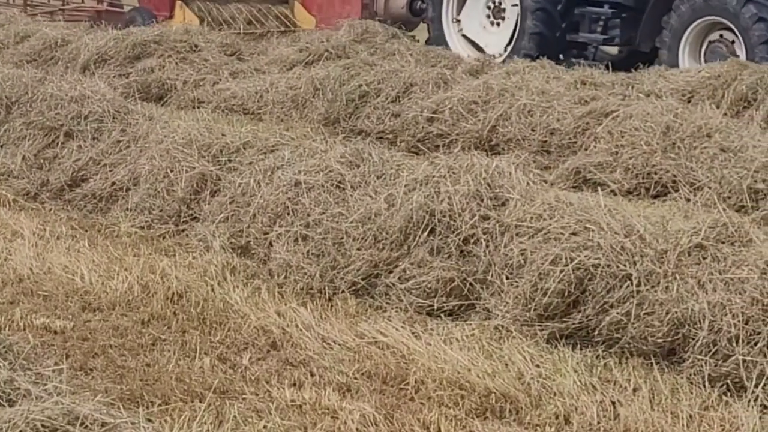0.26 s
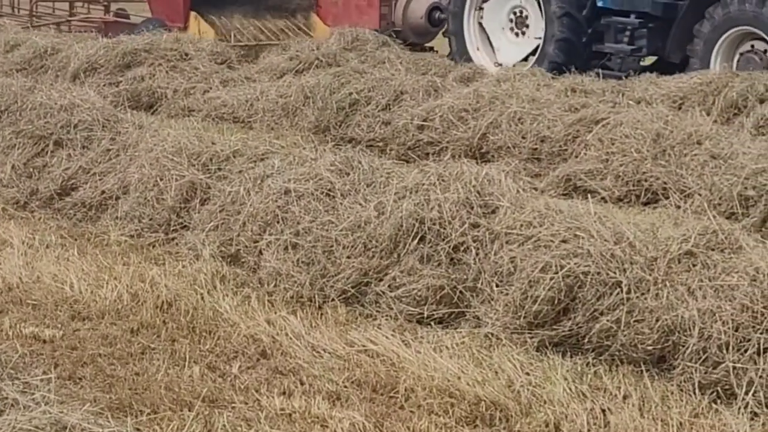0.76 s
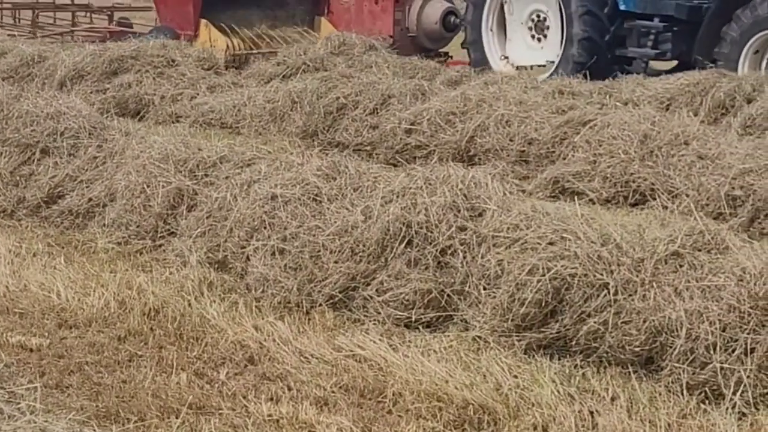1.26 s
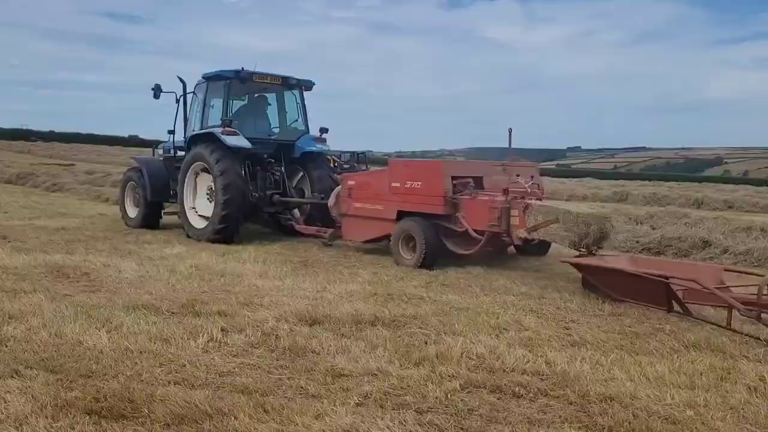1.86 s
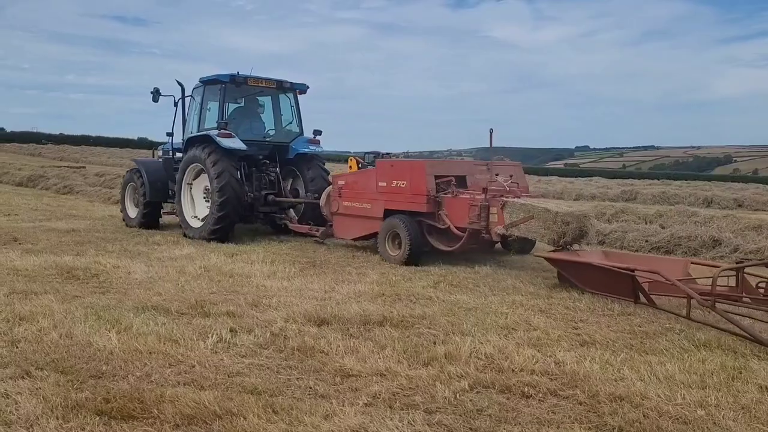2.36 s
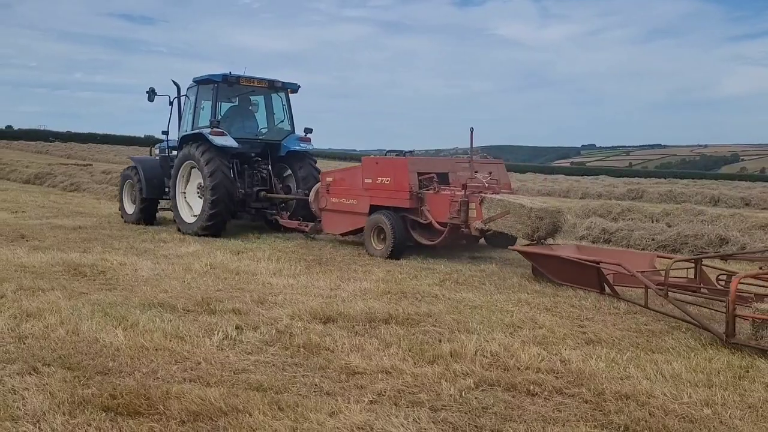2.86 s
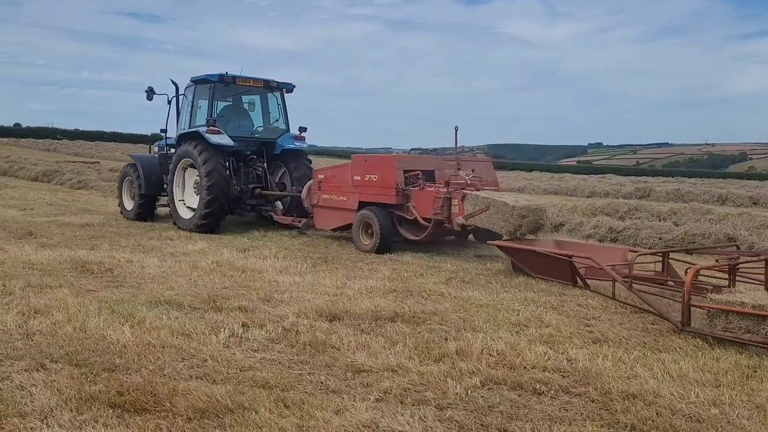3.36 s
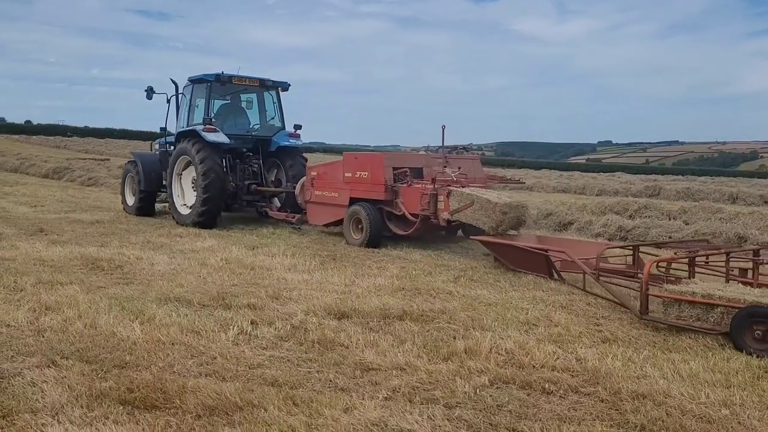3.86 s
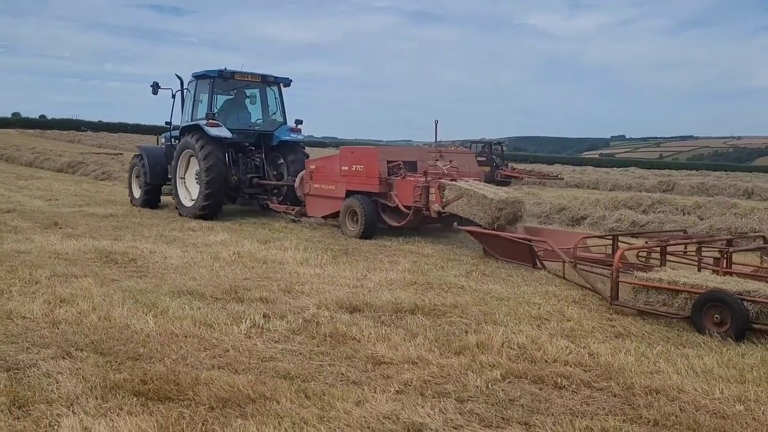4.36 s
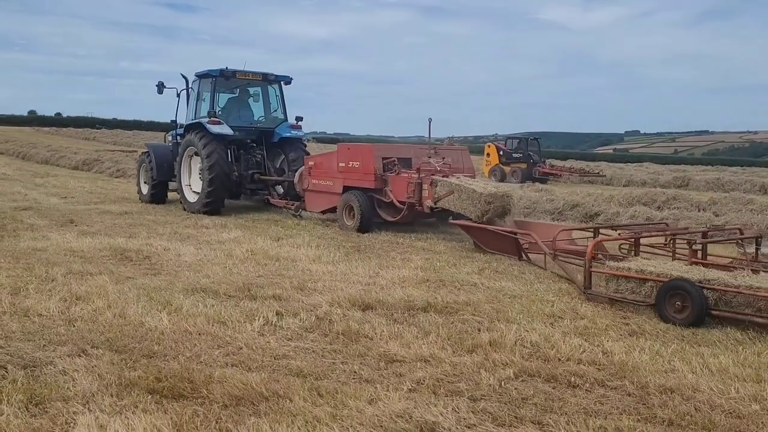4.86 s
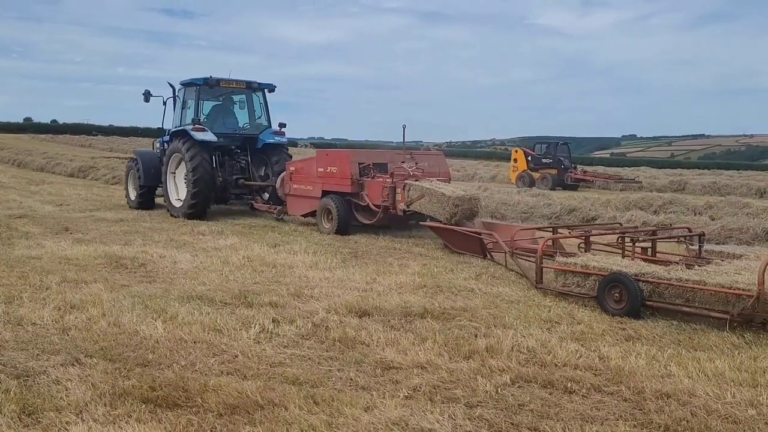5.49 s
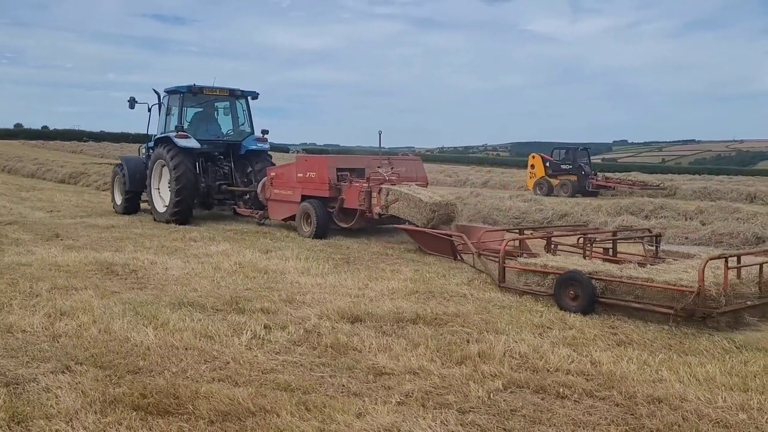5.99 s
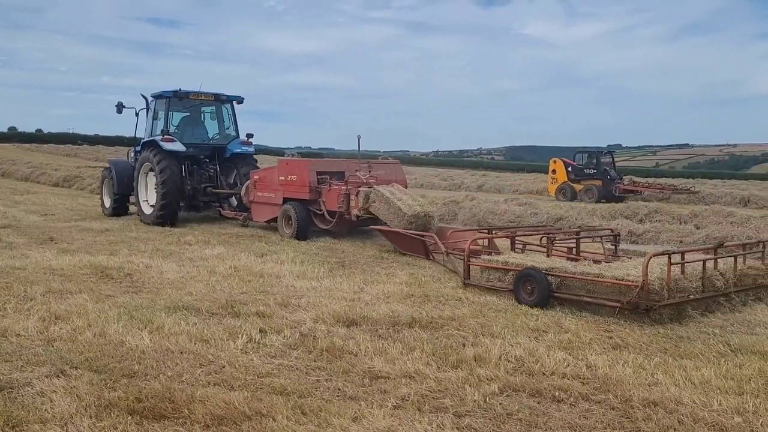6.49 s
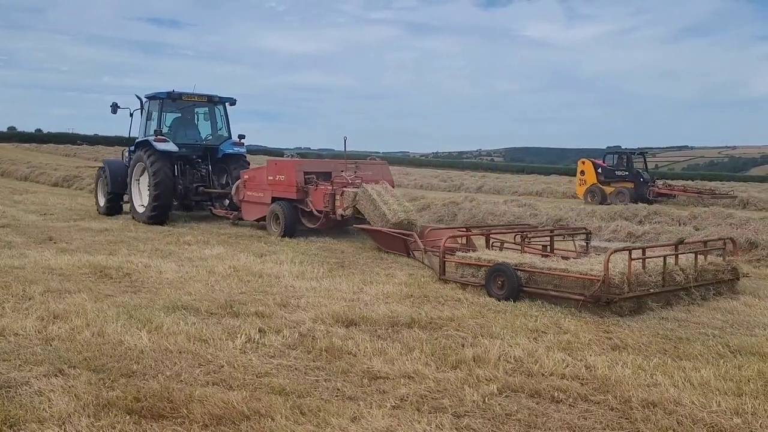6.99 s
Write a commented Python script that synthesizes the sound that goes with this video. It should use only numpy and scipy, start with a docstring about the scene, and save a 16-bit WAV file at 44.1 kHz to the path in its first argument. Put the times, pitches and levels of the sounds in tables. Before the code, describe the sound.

A diesel tractor drones while chains and dry hay rustle close by, then, after a brief gap, a baler clanks about once a second with squeaks.

```python
"""Hay field, two listening places a short near-silence apart: a diesel tractor tows a square baler and a bale sledge.
Place one, beside the windrow: exhaust and drive drone in sines, chains and pickup tines rattle in shaped noise.
Place two, behind as the baler draws away: about once a second plunger joints clank in noise bursts and steel modes;
the chamber rumbles after each stroke, chains rattle, hay slides over steel and a dry bearing squeaks.
Loose steel clinks and the chamber booms at both places. The microphone has two ports, left and right."""
import sys
import numpy as np
from scipy import signal
from scipy.fft import rfft, irfft, next_fast_len
from scipy.io import wavfile
from scipy.ndimage import map_coordinates

SR = 44100
rng = np.random.default_rng(int(sys.argv[2]) if len(sys.argv) > 2 else 0)


def master(y):
    """Save y as 16-bit WAV."""
    cut = np.clip(np.atleast_2d(y).T, -1, 1)
    pcm = np.round(cut * 32767)  # scale
    wavfile.write(sys.argv[1], SR, pcm.astype(np.int16))


N = 319284
TIME = np.arange(N) / SR
BESIDE_END, BEHIND_START = 1.898, 2.015  # t/s at the two places
TOP_HZ = 15950  # upper band limit

# four-stroke cycles a second; four firings in each
CYCLE_HZ = 12.62
# exhaust lines: multiple of the cycle rate, level beside/dB, level behind/dB
EXHAUST = [(4, -41, -30.5), (5, -47.5, -41), (6, -38.5, -37), (9, -37, -41), (10, -45, -36.5),
           (23, -51.5, -44.5)]
# drone of the baler drive: t/s, f/Hz, level/dB of the fundamental
DRONE = [(0, 78.5, -33), (.45, 77.9, -29.5), (.95, 78.3, -34), (1.4, 76.14, -28), (1.85, 78.5, -27.5),
         (2.2, 78.45, -35), (7.2, 77.16, -42)]

# plunger strokes: t/s, size of the wad of hay (1 = usual)
STROKES = [(.381, 0.88), (1.318, 0.95), (2.245, 1.13), (3.189, 1.06), (4.127, 1.07), (5.063, 1.04),
           (5.994, 0.9), (6.937, 0.67)]
# clanks of one stroke: first joint t/s, level/dB, second joint lag/s, level/dB,
# third joint lag/s, level/dB, pitch of the clack f/Hz
CLANKS = [(2.2445, -11.5, .0274, -17.5, .052, -14, 2580), (3.1898, -18, .0339, -16, .0478, -13, 2780),
          (4.127, -10.5, .0169, -16, .0635, -11.5, 2490), (5.0638, -10.5, .0234, -15.5, .0414, -14, 2590),
          (5.9943, -10, .0336, -17, .0588, -14, 2610), (6.937, -13, .0495, -13, 0.057, -23.5, 2830)]
# three slack joints, in slamming order, relative to each blow: body level/dB, edge level/dB, clack level/dB
JOINTS = [(-10.5, -18, -5), (-12, -18.5, -14.5), (-10.5, -16, -12)]
# modes of the clack: ratio to its pitch, relative level/dB
CLACK_MODES = [(.93, -4), (1, -0.5), (1.06, -1), (1.27, -10)]
# steel modes of the plunger linkage: f/Hz, relative level/dB
STEEL_MODES = [(748, -3), (931, -4.5), (1475, 3.5), (2060, 6), (2326, -19), (2536, -2), (2756, -2.5),
               (2977, 2), (3488, -0.5), (4043, 1.5), (4387, -11), (5044, -9), (5450, -3), (7321, -8.5)]
# clank noise spectra, casing body, steel and hard edge: f/Hz, relative level/dB
CLANK_BODY = [(450, -7.5), (750, 1), (1400, -7.5), (2200, -9)]
CLANK_STEEL = [(1400, 1), (2750, -1), (3700, 1.5), (5500, -1), (6500, -32)]
CLANK_EDGE = [(6000, -1.5), (7800, -5), (9200, -11), (12000, -6.5), (16000, -17)]
CHATTER_DB, CHATTER_PER_S = 4.5, 220  # casing chatter: depth, knots a second

# frame and bale chamber rumble spectra: f/Hz, relative level/dB
FRAME = [(45, -12.5), (85, 0.5), (115, -2.5), (150, -2.5), (185, -7), (230, -11.5), (400, -50.5)]
CHAMBER = [(120, -32), (180, -6), (225, -1), (255, 3), (300, -4.5), (345, -5.5), (450, -27), (700, -24.5)]
# bale chamber booms: t/s, frame f/Hz, frame peak level/dB, wall f/Hz, wall peak level/dB
BOOMS = [(.24, 112, -25, 255, -36.5), (.76, 110, -20, 228, -25.5), (1.65, 160, -28.5, 215, -27.5),
         (2.48, 145, -21, 255, -36), (2.68, 148, -21.5, 255, -28.5), (3.55, 150, -26.5, 266, -24.5),
         (4.37, 124, -22, 245, -40), (4.51, 132, -22, 255, -32), (5.42, 155, -30, 255, -26.5),
         (6.37, 125, -30, 250, -26)]

# hay combed up by the pickup tines, before breakage is added: t/s, level/dB
PICKUP_FLOW = [(0, -48), (.2, -47), (.31, -42.5), (.5, -46.5), (.57, -40), (.65, -42.5), (.72, -40.5),
               (.88, -45), (1.12, -48), (1.25, -43.5), (1.45, -42.5), (1.56, -38.5), (1.72, -42),
               (1.9, -46)]
# hay sliding over steel, before the stroke swells: t/s, level/dB
HAY_FLOW = [(2, -52.5), (2.6, -53), (3.1, -53), (4.8, -55.5), (5.8, -53), (6.5, -51.5), (7.2, -50)]
# hay and chain spectra at each place, and the bale sledge: f/Hz, relative level/dB
HAY_BESIDE = [(1590, -41), (2700, 1), (3020, -14.5), (3450, 2.5), (3830, -2), (4220, -1.5), (9790, -14.5),
              (11900, -11.5), (16000, -21.5)]
HAY_BEHIND = [(3530, -7), (6000, -7.5), (6900, -12), (7960, -10.5), (8750, -16.5), (12700, -11.5),
              (16000, -22)]
CHAIN_BESIDE = [(250, -33), (430, -13), (480, -19), (530, -5), (577, -10), (688, -6.5), (878, -9),
                (1080, -4), (1300, -14.5), (1480, -6.5), (1810, -10), (2090, -14.5), (3020, -23),
                (3200, -20.5), (4160, -36), (7040, -120)]
CHAIN_BEHIND = [(250, -1.5), (420, -2), (454, -7), (632, 0), (1010, -13), (1600, -15), (2080, -43),
                (3520, -120)]
SLEDGE = [(820, -3), (1400, 2.5), (1720, -1.5), (1960, 3.5), (2120, -0.5), (2750, -2.5), (3310, -8),
          (5290, -13), (6800, -36.5), (8840, -56), (15000, -120)]
# gears and sprockets of the pickup, before GEAR_DB: f/Hz, level/dB
GEAR_LINES = [(549.1, -53), (995.9, -48), (1120, -51), (1534, -53), (1755, -48)]
GEAR_DB = -1

# dry bearing squeaks: t/s, length/s, start f/Hz, end f/Hz, relative level/dB, growth/dB, overtone level/dB
SQUEAKS = [(2.785, .12, 1790, 1760, -40, 2, -1), (2.89, .105, 1650, 1626, -37.5, 7, -14),
           (3.072, .135, 1586, 1612, -32, -11, -24), (3.45, .105, 1606, 1638, -27.5, 10, -27),
           (4.37, .095, 1825, 1830, -42.5, 0, -17), (4.535, .065, 1835, 1805, -42, 2, -15),
           (4.63, .12, 1628, 1620, -42, 2, -18), (5.875, .125, 1794, 1764, -34.5, -2, -11),
           (5.98, .135, 1778, 1776, -33.5, -10, -24), (6.655, .062, 1560, 1572, -35, 0, -9),
           (6.706, .056, 1574, 1588, -36, 1, -10), (6.752, .06, 1600, 1606, -45, -4, -20),
           (6.87, .075, 1995, 1975, -44, 3, -28)]
# overtones of a squeak: multiple of its pitch, relative level/dB
OVERTONES = [(2, -8), (3, -12), (4, -11), (5, -14), (6, -23), (7, -19), (8, -25)]
# loose steel clinking: t/s, relative tap level/dB, ring f/Hz, relative ring level/dB
CLINKS = [(.381, -35, 4300, -36.5), (.445, -33, 5500, -43), (0.8306, -47, 6020, -37),
          (1.216, -42, 6170, -42), (1.319, -27.5, 3480, -47), (1.54, -37, 6240, -36.5),
          (2.5486, -35.5, 12500, -41), (2.7194, -35, 12700, -41.5), (3.053, -37, 4000, -38),
          (3.1174, -37, 5500, -33), (4.036, -33, 5690, -36.5), (4.562, -46, 5400, -38.5),
          (5.137, -33, 4000, -33), (5.2165, -34, 3950, -34), (6.1644, -40, 11000, -50),
          (6.2159, -24.5, 4550, -35), (6.23, -38.5, 7960, -37), (6.311, -39, 6030, -40),
          (6.332, -33, 9200, -47), (6.42, -35, 4200, -48), (6.485, -33, 5700, -41),
          (6.3757, -32.5, 4900, -38), (6.464, -36, 3010, -41), (6.5158, -30, 4600, -36),
          (6.5464, -32.5, 4600, -38), (6.566, -34, 7920, -35), (6.604, -34, 4280, -41)]
# modes of a loose pin: ratio to the ring pitch, relative level/dB
PIN_MODES = [(.92, -5), (0.998, 4), (1.025, -7), (1.11, -7)]
# spectrum of a bright tap: f/Hz, relative level/dB
CLINK_BAND = [(3000, 5), (4500, 3.5), (9000, -14), (15000, -21)]

# two microphone ports at each place: f/Hz, likeness of the ports (0 to 1),
# nominal left lead/rad, nominal left minus right level/dB
PORTS_BESIDE = [(270.6, 0.94, 0.1, -5), (412, 0.62, 1.1, -6), (530, 0.89, 0.97, 5.5), (780, 1, 0.24, -2),
                (1080, 0.85, 1.3, -3), (1580, 0.68, 4.85, -5.5), (1870, 0.94, 7.65, 0.5),
                (2880, .3, 7.7, 3), (4000, 0.48, 6.2, 1.5), (11000, .15, 8.8, -2.5)]
PORTS_BEHIND = [(200, 1, 0.39, -4), (754, 0.91, 0.24, -2.5), (1110, 0.43, -1, 0), (1600, 0.61, -1.2, 2),
                (2430, 0.14, 1.5, 6), (5400, 0.29, -2, 2.5), (8850, .15, -2.5, -3.5),
                (11740, 0.17, -0.5, 1)]

# swells with every stroke: centre after the stroke t/s, half width/s, rise/dB for a usual wad
FRAME_FEED, FRAME_RAM = (-0.066, 0.11, 2.7), (0.29, 0.18, 4.6)
CHAMBER_FEED, CHAMBER_RAM = (-0.036, 0.1, 4.3), (0.35, 0.15, 7)
CHAIN_PULL, SLEDGE_JERK, HAY_SLIDE = (0.22, 0.25, 4), (0.17, 0.33, 5.9), (0.22, 0.22, 4.1)
PICKUP_PULL, PICKUP_BITE = (0.18, 0.35, 4.6), (0.091, 0.055, 2.5)
CHAIN_FEED = (-0.065, 0.014, 6.9)  # the feeder snatches at its chain just before the stroke

# base levels/dB, before swells and distance
BESIDE_FRAME_DB, BESIDE_CHAMBER_DB, BESIDE_CHAIN_DB = -30.5, -38.5, -37.5
BEHIND_FRAME_DB, BEHIND_CHAMBER_DB, BEHIND_CHAIN_DB, BEHIND_SLEDGE_DB = -28.5, -36, -38, -40.5
# distance: the baler draws away from the second place
FRAME_FADES_DB_PER_S, CHAIN_FADES_DB_PER_S, SLEDGE_FADES_DB_PER_S = 0.24, 0.7, 0.7
SLEDGE_FOLLOWS_HAY = 0.42  # dB of sledge rattle per dB of hay flow


def amp(db):
    """Decibels to gain."""
    return 10 ** (np.asarray(db) / 20)


def unit(x):
    """Scale to rms 1."""
    return x / np.sqrt(np.mean(x ** 2) + 1e-20)


def along(points, hz):
    """Read (f/Hz, value) points on a log frequency axis."""
    f, value = np.transpose(points)
    return np.interp(np.log(hz + 1), np.log(f + 1), value)


def curves(rows):
    """One value per sample for each column after the time."""
    s, *columns = np.transpose(rows)
    return [np.interp(TIME, s, column) for column in columns]


def wobble(rate, size=N):
    """A smooth random curve, rate knots a second."""
    knots = rng.standard_normal(int(size * rate / SR) + 4)
    return map_coordinates(knots, [TIME[:size] * rate])


def swell(*shapes):
    """Bell-shaped rises in dB that repeat with each plunger stroke, greater for a bigger wad of hay."""
    return sum(wad * rise_db * np.exp(-((TIME - s - centre) / width) ** 2)
               for s, wad in STROKES for centre, width, rise_db in shapes)


def distance():
    """Seconds since the baler began to draw away from the second place."""
    return np.maximum(TIME - BEHIND_START, 0)


def filtered(x, response):
    """Multiply the spectrum of x by a response of frequency."""
    n = x.shape[-1]
    padded = next_fast_len(n + 8192)
    return irfft(rfft(x, padded) * response(np.fft.rfftfreq(padded, 1 / SR)), padded)[..., :n]


def coloured(pair, spectrum, ports):
    """Two unrelated signals become left and right as the ports hear this spectrum; their middle has rms 1."""
    table = np.array(ports)

    def response(hz, sign):
        """Gains of one signal into the left and right port."""
        alike, lead, lean_db = (along(table[:, [0, k]], hz) for k in range(1, table.shape[1]))
        alike = np.clip(alike, 0, .99)
        left = amp(lean_db / 2) * np.exp(.5j * lead)
        middle = np.sqrt(abs(left) ** 2 + abs(left) ** -2 + 2 * alike * np.cos(lead))
        # power-law skirts beyond both ends of the spectrum
        skirts = np.minimum(1, np.minimum(hz / spectrum[0][0], spectrum[-1][0] / (hz + 1))) ** 2
        gain = amp(along(spectrum, hz)) * skirts * np.sqrt(1 + sign * alike) / middle
        return gain * np.array([left, sign / left])

    together = filtered(pair[0], lambda hz: response(hz, 0.72))
    opposed = filtered(pair[1], lambda hz: response(hz, -1))
    out = together + opposed
    return out / np.std(out.mean(0))


def add(track, s, sound):
    """Mix a stereo sound into the track at time s."""
    part = track[:, max(0, round(s * SR)):][:, :sound.shape[-1]]
    part += sound[:, :part.shape[-1]]


def rattle(spectrum, ports, rate, life, share):
    """Random contacts, rate a second, fall 60 dB in life seconds; share is their part of the power, the rest steady."""
    sizes = (rng.random(N) < rate / SR) * rng.random(N)
    power = np.abs(signal.fftconvolve(sizes, amp(-120 * TIME[:SR // 4] / life))[:N])
    share = np.clip(share, 0, 1)
    contacts = np.sqrt(1 - share + share * power / power.mean())
    return coloured(contacts * rng.standard_normal((2, N)), spectrum, ports)


def burst(spectrum, attack, t60):
    """Dense panel modes rung by one blow: shaped noise that falls 60 dB in t60 seconds."""
    t = TIME[:SR // 4]
    noise = coloured(rng.standard_normal((2, len(t))), spectrum, PORTS_BEHIND)
    return noise * amp(-60 * t / t60) * (1 - np.exp(-t / attack))


def ring(modes, t60):
    """Steel modes rung anew by each blow, each pitch scattered slightly at random, stronger on the left."""
    t = TIME[:SR // 4]
    hz, db = np.transpose(modes)[:, :, None, None]
    hz = hz * (1 + rng.normal(0, .008, hz.shape))
    gain = amp(db + rng.normal(0, 4.3, hz.shape))
    cycles = rng.random(hz.shape) + .2 * rng.random((len(hz), 2, 1))  # ports differ slightly in phase
    out = unit((gain * np.sin(2 * np.pi * (hz * t + cycles))).sum(0))
    return out * amp([[2.5], [-2.5]]) * amp(-60 * t / t60) * (1 - np.exp(-t / 0.00074))


def engine(levels_db, flutter_db):
    """Governed diesel: the firing line is steadiest, the lines from unequal cylinders flutter more."""
    turns = np.cumsum(CYCLE_HZ * (1 + 0.00218 * wobble(2.056))) / SR
    out = np.zeros(N)
    for (order, *_), db in zip(EXHAUST, levels_db):
        depth_db = flutter_db * (.25 if round(order) == 4 else 1)  # four firings a cycle
        line = np.sin(2 * np.pi * (round(order) * turns + rng.random()))
        out += amp(db + depth_db * wobble(6)) * line
    return np.sqrt(2) * out


def drive(octave_db):
    """The baler drive drones with its octave, its pitch sagging a little under load."""
    hz, db = curves(DRONE)
    phase = 2 * np.pi * np.cumsum(hz) / SR
    tone = np.sin(phase) + amp(octave_db) * np.sin(2 * phase)
    return np.sqrt(2) * amp(db + 2.5 * wobble(8)) * tone


def clanks(lead):
    """At each stroke slack joints slam in turn: pitched clack, ringing steel, hard edge, chattering casing."""
    out = np.zeros((2, N))
    for s, first_db, second_lag, second_db, third_lag, third_db, clack_hz in CLANKS:
        blows = [(0, first_db), (second_lag, second_db), (third_lag, third_db)]
        clack_modes = [(clack_hz * ratio, level) for ratio, level in CLACK_MODES]
        for (lag, db), (body_db, edge_db, clack_db) in zip(blows, JOINTS):
            clack = amp(clack_db) * ring(clack_modes, t60=0.032)
            steel = amp(-9.5) * burst(CLANK_STEEL, attack=0.002, t60=0.067)
            steel = steel + amp(-12.5) * ring(STEEL_MODES, t60=0.097)
            chatter = unit(amp(CHATTER_DB * wobble(CHATTER_PER_S, SR // 4)))
            body = amp(body_db) * chatter * burst(CLANK_BODY, attack=0.0029, t60=0.17)
            edge = amp(edge_db) * burst(CLANK_EDGE, attack=0.00079, t60=0.037)
            add(out, s + lag - lead, amp(db) * (clack + steel + body + edge))
    return out


def rumble(thud_db, chamber_db, ports):
    """Uneven thuds shake frame and chamber: a little as hay is fed in, more as it is rammed along."""
    frame = rattle(FRAME, ports, rate=71, life=0.1, share=0.41)
    chamber = rattle(CHAMBER, ports, rate=58, life=0.12, share=0.64)
    frame_gain = amp(thud_db + swell(FRAME_FEED, FRAME_RAM))
    chamber_gain = amp(chamber_db + swell(CHAMBER_FEED, CHAMBER_RAM))
    return frame_gain * frame + chamber_gain * chamber


def booms(width, waver):
    """The chamber's frame and walls swell in two low, unsteady tones at each boom."""
    out = np.zeros(N)
    for s, frame_hz, frame_db, wall_hz, wall_db in BOOMS:
        bell = np.exp(-((TIME - s) / width) ** 2)
        stretch = np.cumsum(1 + waver * wobble(45)) / SR  # frame and wall waver together
        for hz, db in [(frame_hz, frame_db), (wall_hz, wall_db)]:
            out += amp(db) * bell * np.sin(2 * np.pi * (hz * stretch + rng.random()))
    return out


def pickup_hay():
    """Pickup tines comb through dry hay: dense contacts, with single stalks snapping."""
    flow_db, = curves(PICKUP_FLOW)
    rustle = amp(flow_db) * rattle(HAY_BESIDE, PORTS_BESIDE, rate=86, life=0.12, share=0.43)
    return rustle + amp(flow_db - 12) * stalks(rate=170, spread_db=10, ports=PORTS_BESIDE)


def chains_beside():
    """Chains whirr close by as overlapping link contacts, louder as each stroke pulls and bites."""
    links = rattle(CHAIN_BESIDE, PORTS_BESIDE, rate=140, life=0.14, share=0.28)
    return amp(BESIDE_CHAIN_DB + swell(PICKUP_PULL, PICKUP_BITE)) * links


def chains_behind():
    """Chains rattle in short contacts, snatched by the feeder and pulled at each stroke, fading with distance."""
    level_db = BEHIND_CHAIN_DB - CHAIN_FADES_DB_PER_S * distance() + swell(CHAIN_FEED, CHAIN_PULL)
    return amp(level_db) * rattle(CHAIN_BEHIND, PORTS_BEHIND, rate=110, life=0.045, share=0.12)


def sledge():
    """The sledge jolts in noisy contacts, jerked by each stroke, following the hay and fading with distance."""
    flow_db, = curves(HAY_FLOW)
    level_db = BEHIND_SLEDGE_DB - SLEDGE_FADES_DB_PER_S * distance()
    level_db = level_db + SLEDGE_FOLLOWS_HAY * (flow_db - flow_db.mean()) + swell(SLEDGE_JERK)
    return amp(level_db) * rattle(SLEDGE, PORTS_BEHIND, rate=150, life=0.16, share=0.49)


def sliding_hay():
    """Hay slides over steel as fine contacts, more after each stroke, with a few stalks snapping."""
    level_db = curves(HAY_FLOW)[0] + swell(HAY_SLIDE)
    slide = amp(level_db) * rattle(HAY_BEHIND, PORTS_BEHIND, rate=51, life=0.03, share=0.19)
    return slide + amp(level_db - 10) * stalks(rate=18, spread_db=-3.5, ports=PORTS_BEHIND)


def stalks(rate, spread_db, ports):
    """Single dry stalks snap against steel: noise bursts of random size, rate a second, falling 60 dB in 14 ms."""
    snaps = (rng.random(N) < rate / SR) * amp(spread_db * np.clip(rng.standard_normal(N), -2, 2))
    bursts = signal.fftconvolve(snaps, amp(-60 * TIME[:SR // 20] / .014))[:N]
    spectrum = [(3500, 2), (6500, 0), (9000, -3.5), (14000, -19)]
    return coloured(bursts * rng.standard_normal((2, N)), spectrum, ports)


def squeaks(waver, rough_db, flicker_db):
    """A dry bearing sticks and slips in gliding harmonics, harshest mid-squeak, leading in the left port."""
    out = np.zeros((2, N))
    lead = np.array([[1.7], [0]])  # rad
    for s, length, start_hz, end_hz, db, grow_db, bright_db in SQUEAKS:
        n = int(length * SR)
        hz = np.linspace(start_hz, end_hz, n) * (1 + waver * wobble(250, n))
        turning = 2 * np.pi * np.cumsum(hz) / SR
        harsh = sum(amp(bright_db + level + flicker_db * wobble(91, n)) * np.sin(round(order) * turning + lead)
                    for order, level in OVERTONES)
        tone = np.sin(turning + lead) + signal.windows.tukey(n, .5) * harsh
        shape = signal.windows.tukey(n, .3) * amp([[8.5], [4.5]])  # left, right level/dB
        level_db = db + grow_db * np.linspace(-.5, .5, n) + rough_db * wobble(84, n)
        add(out, s, amp(level_db) * shape * tone)
    return out


def clinks(lead):
    """Loose pins and bars tap, each with its own short, bright ring, and knock dully on the casing."""
    out = np.zeros((2, N))
    for s, db, ring_hz, ring_db in CLINKS:
        bright = amp(-6.0) * burst(CLINK_BAND, attack=0.00092, t60=0.15)
        dull = amp(-0.5) * burst(CLANK_BODY, attack=0.00088, t60=0.12)
        snap = amp(0.5) * burst(CLINK_BAND, attack=.0003, t60=.022)
        pin = ring([(ring_hz * ratio, level) for ratio, level in PIN_MODES], t60=0.075)
        add(out, s - lead, amp(db) * (bright + dull + snap) + amp(ring_db) * pin)
    return out


def gears(waver, flutter_db):
    """Gears and sprockets sing faintly as sines, wavering together with the shaft."""
    stretch = np.cumsum(1 + waver * wobble(4.97)) / SR
    out = np.zeros((2, N))
    for hz, db in GEAR_LINES:
        cycles = rng.random() + .2 * rng.random((2, 1))
        out += amp(db + flutter_db * wobble(9.3)) * np.sin(2 * np.pi * (hz * stretch + cycles))
    return np.sqrt(2) * out


def beside():
    """By the windrow: exhaust, rumble, pickup hay, chains and gears."""
    exhaust = engine([row[1] for row in EXHAUST], flutter_db=1.5)
    thuds = rumble(BESIDE_FRAME_DB, BESIDE_CHAMBER_DB, PORTS_BESIDE)
    singing = amp(GEAR_DB) * gears(waver=0.0035, flutter_db=1.5)
    return exhaust + thuds + pickup_hay() + chains_beside() + singing


def behind():
    """Behind the baler as it draws away: exhaust, clanks, rumble, chains, sledge, hay and squeaks."""
    exhaust = engine([row[2] for row in EXHAUST], flutter_db=3.0)
    far_db = FRAME_FADES_DB_PER_S * distance()
    thuds = rumble(BEHIND_FRAME_DB - far_db, BEHIND_CHAMBER_DB - far_db, PORTS_BEHIND)
    bearing = squeaks(waver=0.0055, rough_db=1.8, flicker_db=4)
    return exhaust + clanks(lead=0.0017) + thuds + chains_behind() + sledge() + sliding_hay() + bearing


def scene():
    """The two listening places in turn, sharing drive, booms and clinks."""
    shared = drive(octave_db=-6) + booms(width=0.056, waver=0.0392) + clinks(lead=0.000975)
    first = beside() + shared
    second = behind() + shared
    fade = .002  # s
    leave = np.clip((BESIDE_END - TIME) / fade, 0, 1)
    arrive = np.clip((TIME - BEHIND_START) / fade, 0, 1)
    return first * leave + second * arrive


def record(dry):
    """A faint low noise floor under everything, and nothing above the band limit."""
    noise = rng.standard_normal((2, N))
    floor = amp(-79.0) * coloured(noise, [(30, -14), (80, -6), (250, 1)], PORTS_BEHIND)
    return filtered(dry + floor, lambda hz: hz < TOP_HZ)


dry = scene()
out = record(dry)
master(out)
```